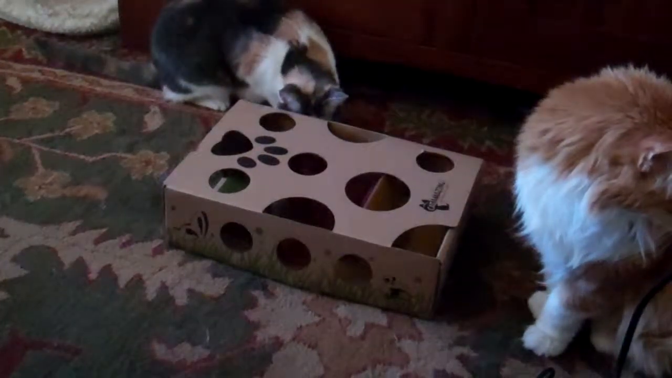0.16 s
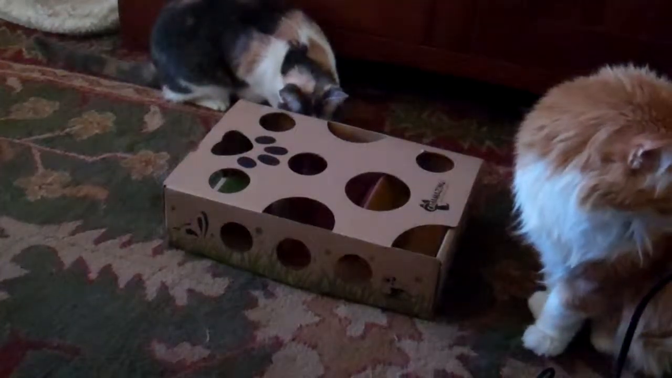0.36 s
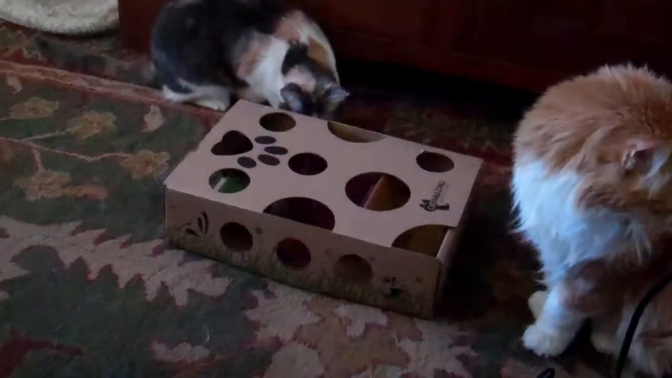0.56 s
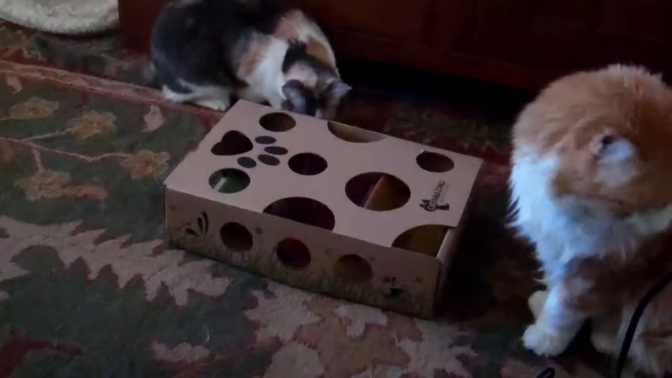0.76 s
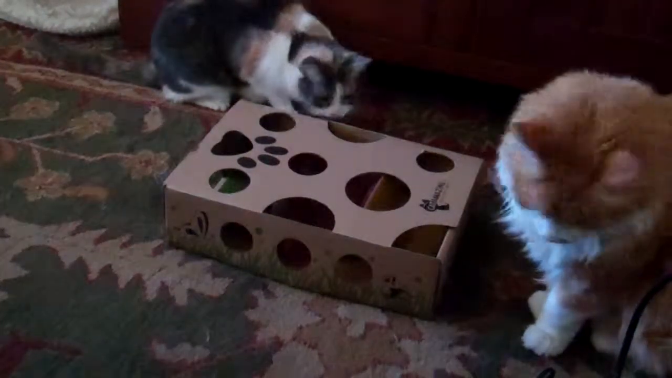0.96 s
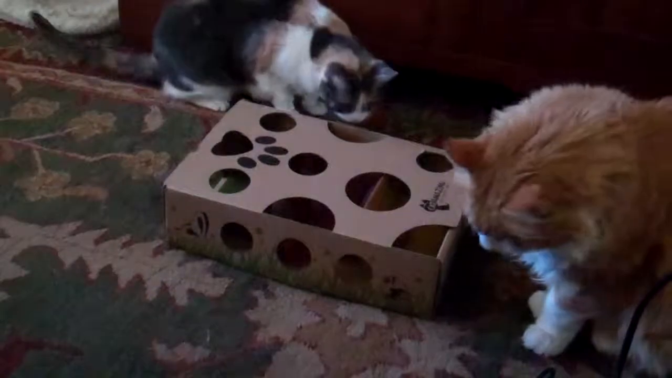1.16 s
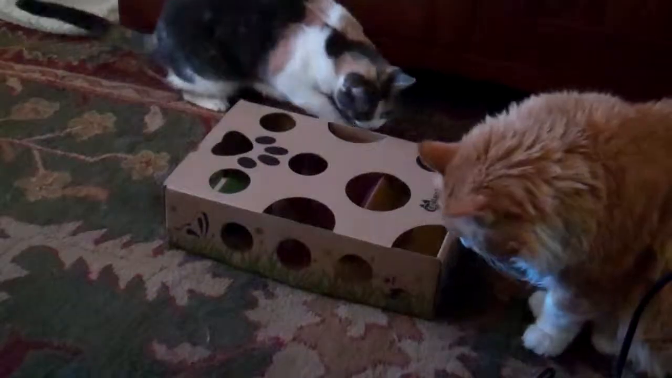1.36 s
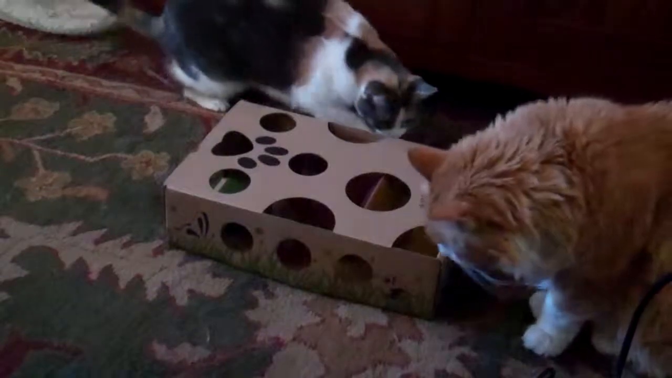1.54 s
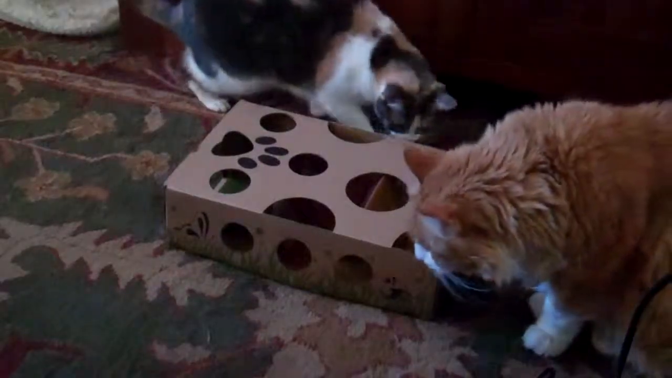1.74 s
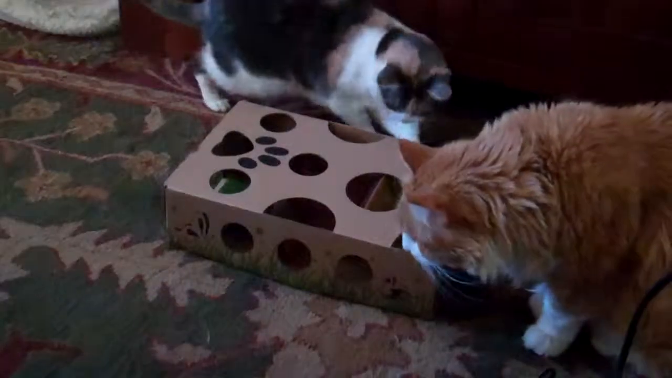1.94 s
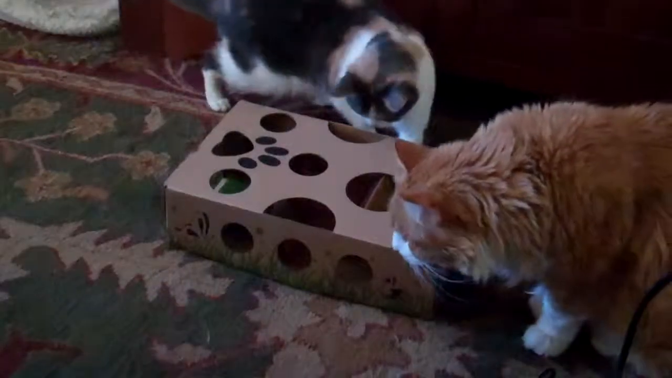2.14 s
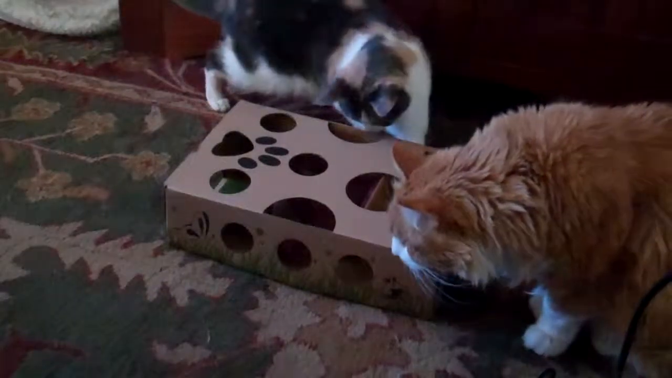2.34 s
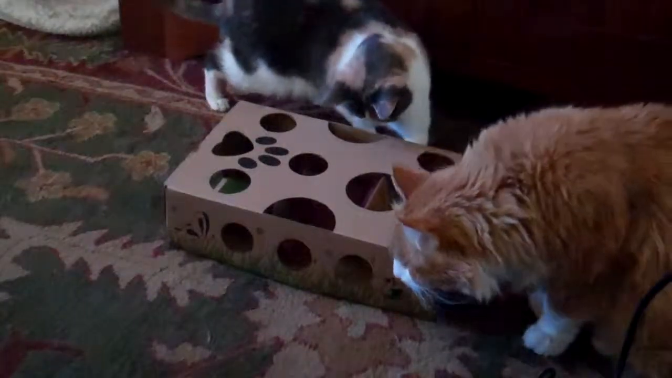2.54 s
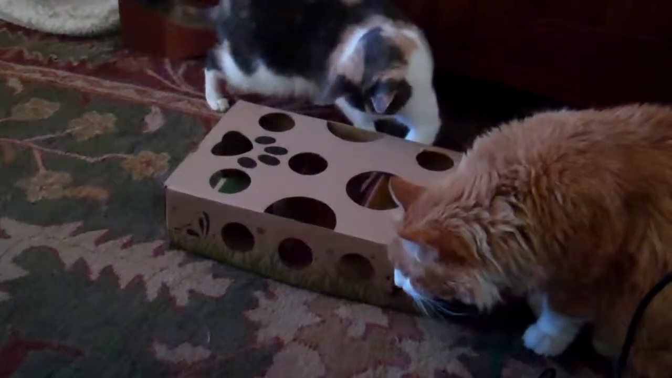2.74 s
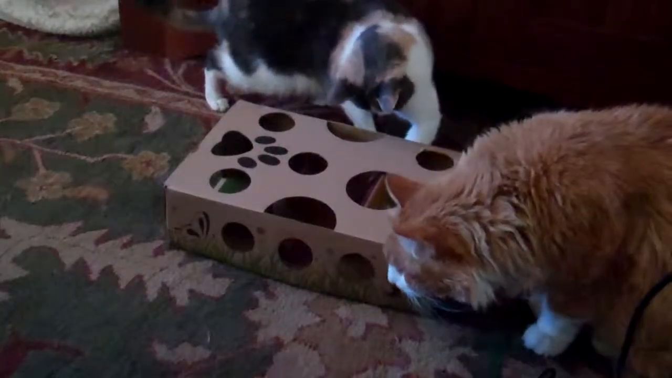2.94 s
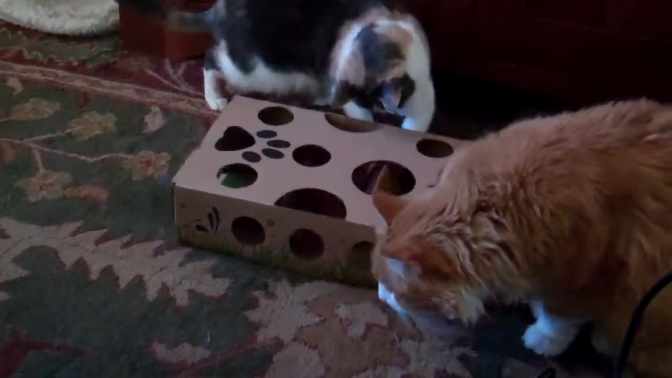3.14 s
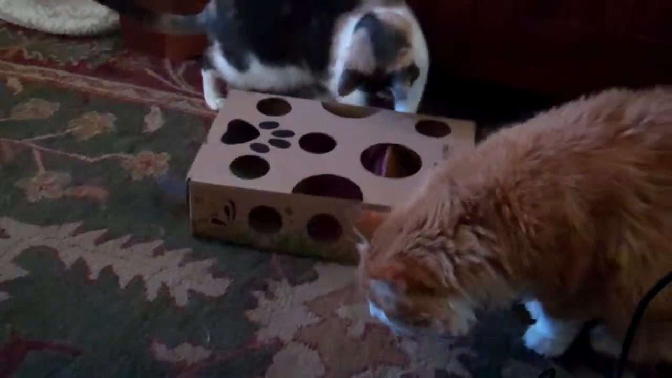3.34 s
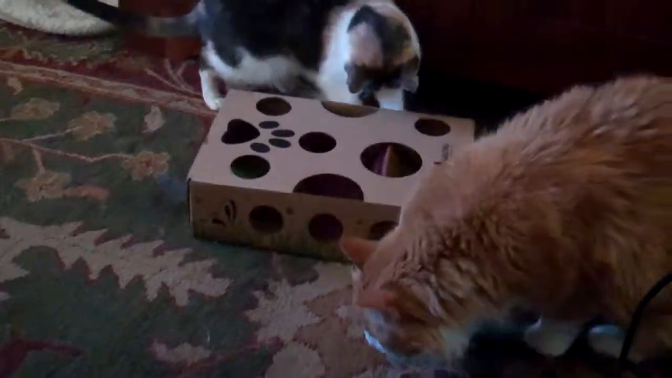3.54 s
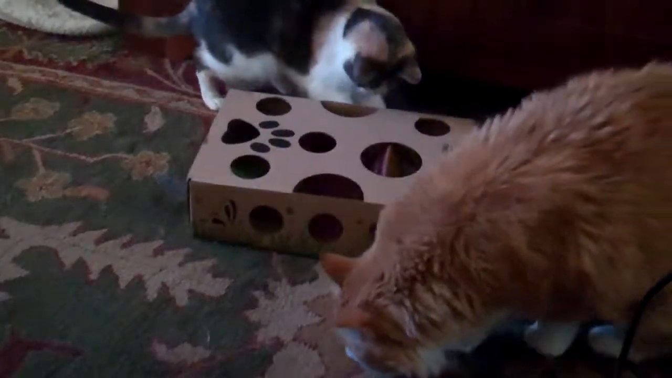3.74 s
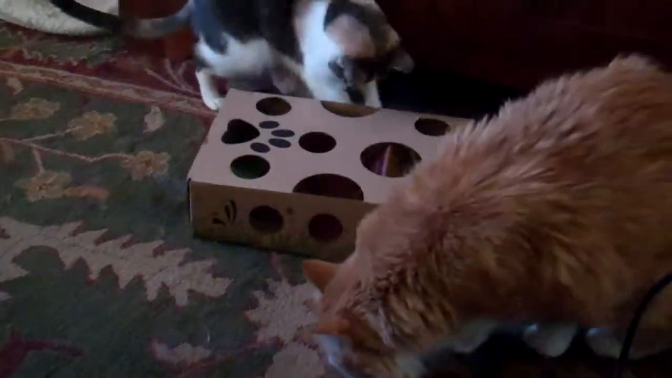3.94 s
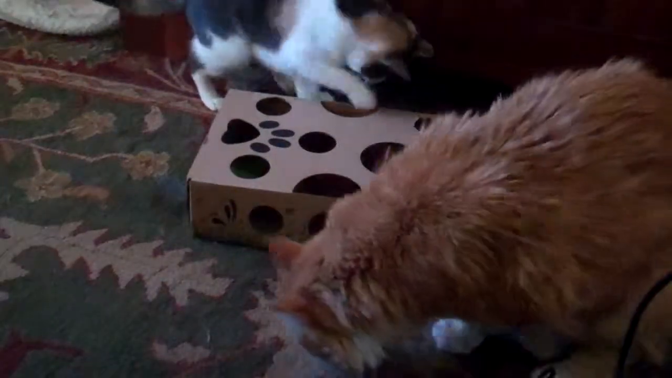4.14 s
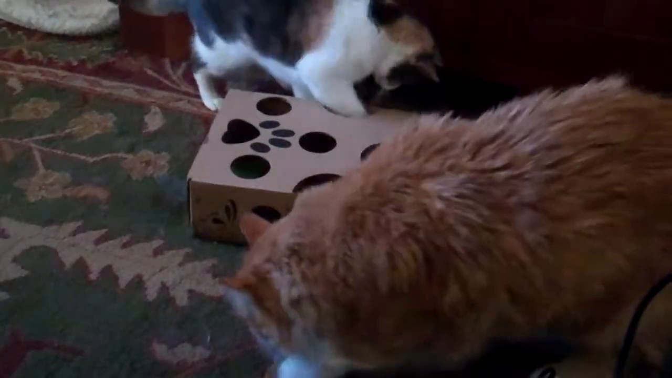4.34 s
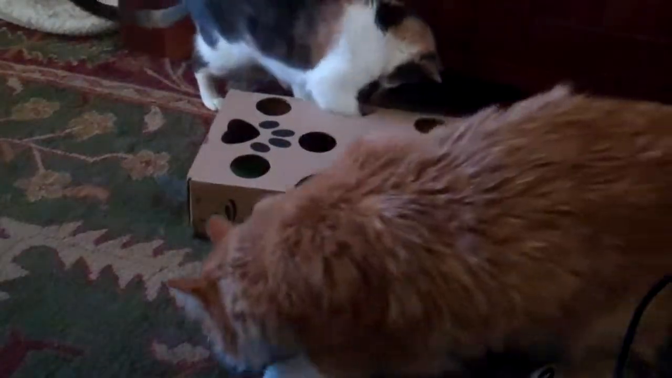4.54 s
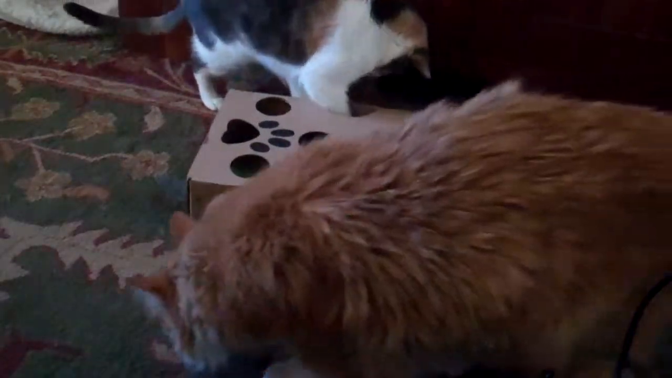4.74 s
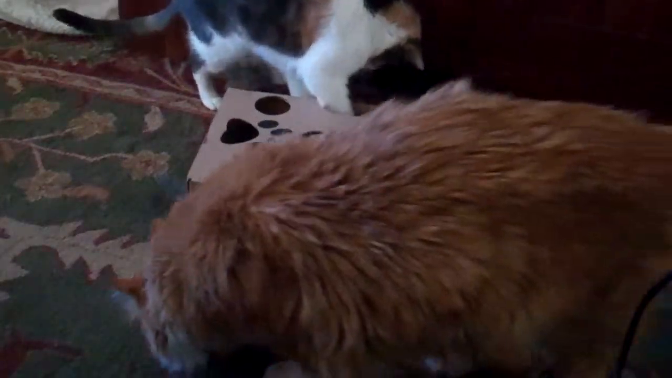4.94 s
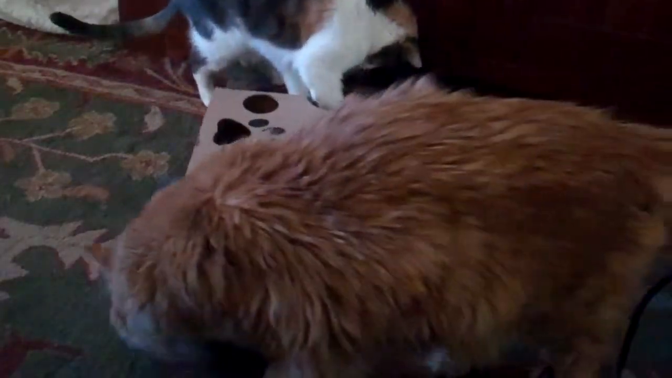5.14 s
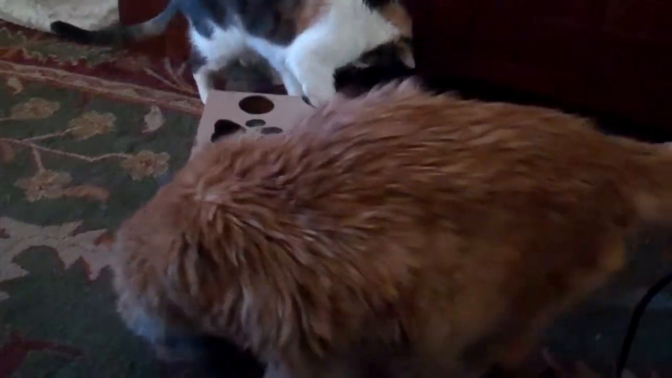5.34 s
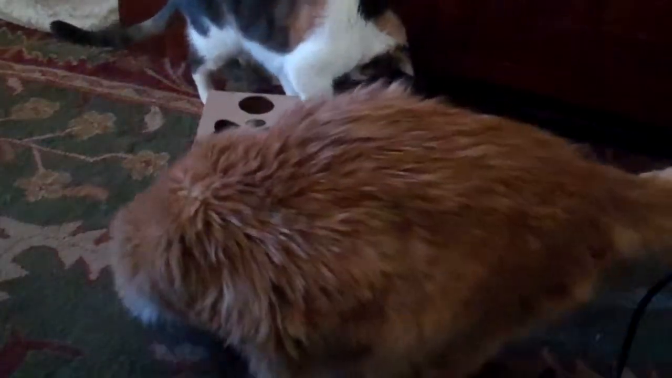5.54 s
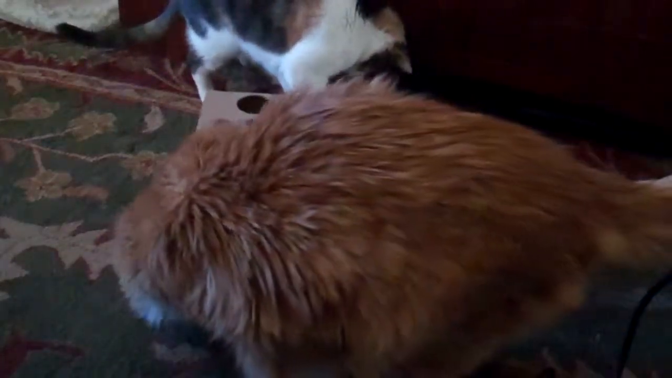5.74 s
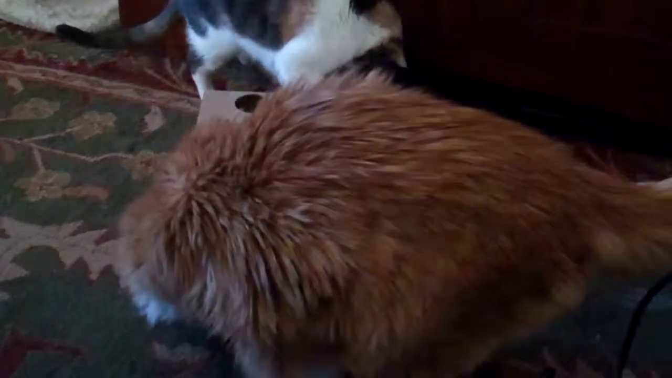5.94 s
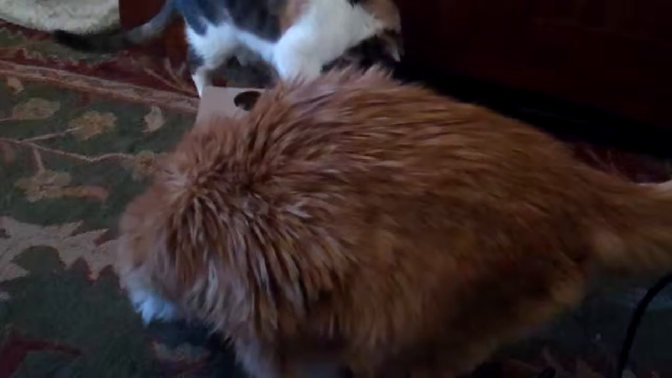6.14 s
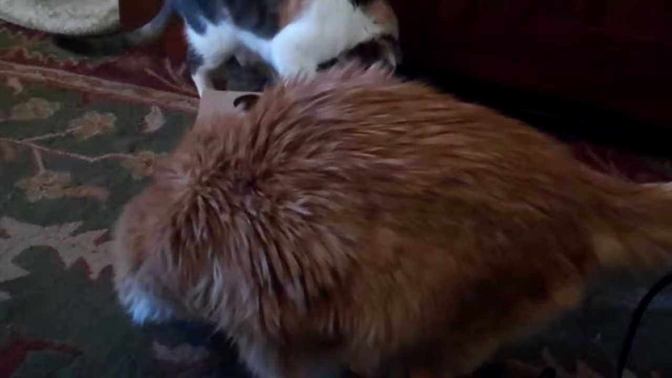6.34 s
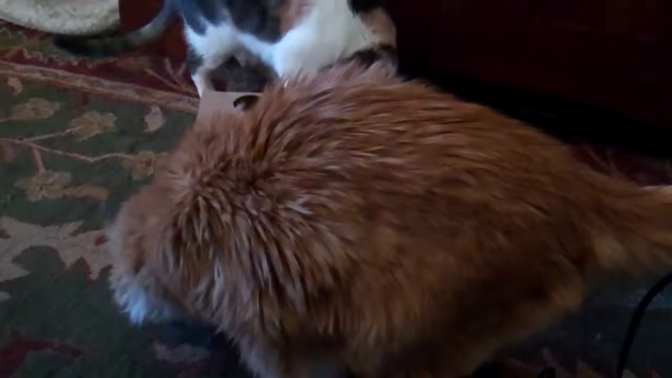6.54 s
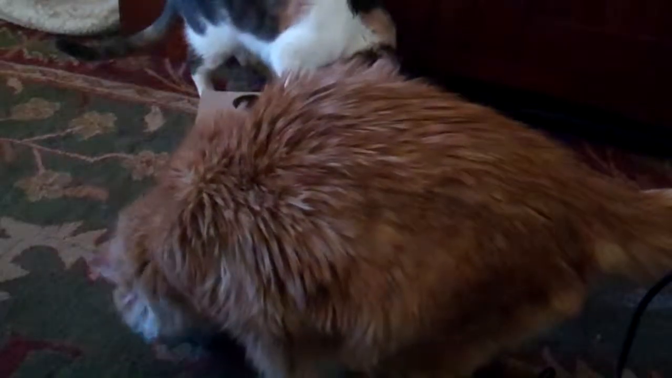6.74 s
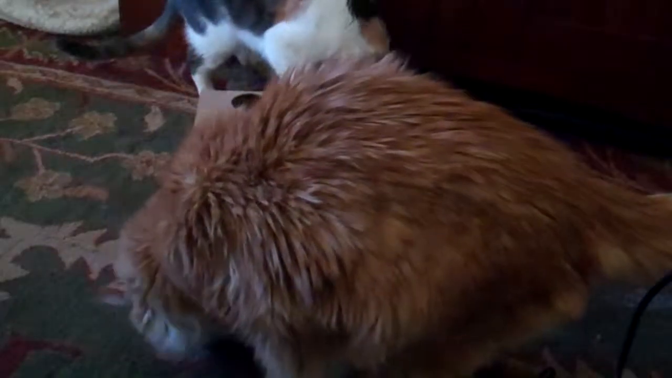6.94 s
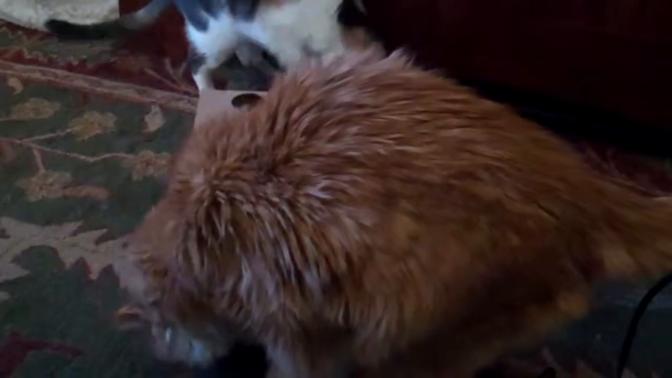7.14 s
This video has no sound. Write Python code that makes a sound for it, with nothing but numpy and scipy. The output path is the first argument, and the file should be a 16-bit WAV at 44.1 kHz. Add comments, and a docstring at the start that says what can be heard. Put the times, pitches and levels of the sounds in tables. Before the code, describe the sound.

A quiet carpeted room with faint air hiss and low appliance hum. A cat paws at a hollow cardboard puzzle box: a light tap and rattle, then scratches, a tiny squeak and a soft drag over the rug. A cluster of knocks and rasping follows, then sharper isolated claw knocks, ending in soft pats. Close microphone, box slightly left, short room echo.

```python
"""A small quiet room with a rug: a cat fishes through the holes of a cardboard puzzle box, a step away.
Its claws knock, scrape and squeak on the card (struck echoes, shaped noise, wavering tones), its pads
pat and groan, something light rocks inside, and the box drags over the pile before fur brushes the card.
The hollow box rings in its modes, the room answers with decaying noise, and an appliance hums under
still air. The camera's gain control ducks just after the sharpest knocks."""
import sys
import numpy as np
from scipy import signal
from scipy.fft import rfft, irfft, next_fast_len
from scipy.io import wavfile
from scipy.ndimage import uniform_filter1d, minimum_filter1d, map_coordinates

SR = 44100
rng = np.random.default_rng(int(sys.argv[2]) if len(sys.argv) > 2 else 0)


def put_to_file(sound):
    """Save the sound as 16-bit audio at rate SR, in the file named by the first command-line argument."""
    columns = np.atleast_2d(sound).T  # one column per channel
    safe = np.clip(columns, -1, 1)
    whole_steps = np.round(safe * 32767)
    wavfile.write(sys.argv[1], SR, whole_steps.astype(np.int16))


N = 321489  # length [samples]

# A claw strikes the card, then skids; levels before the box and mix trims: (time [s], level [dB],
# contact pitch [Hz], tip's tick [dB rel. level], skid [dB rel. level], boom [dB rel. level], boom pitch [Hz])
KNOCKS = [(1.249, -50, 3040, -1, -8, -18, 500), (2.231, -35, 2710, -29, -15.5, -24, 900),
          (3.460, -37.5, 1510, 0, -14, 1.5, 504), (3.674, -29.5, 1040, -25, -35, -12, 900),
          (3.69, -40.5, 3380, -20, -18, -21, 1390), (3.700, -56, 1970, -14, -25, -14, 1100),
          (3.7045, -38, 3000, -19, -36, -4, 434), (3.749, -40, 1550, -21, -26, -19, 1300),
          (3.799, -30, 835, -15, -29, -23, 440), (3.8004, -29, 2380, -14, -16.5, -2, 1630),
          (4.4873, -30, 1005, -16, -6.5, -5.5, 650), (4.995, -46, 3950, -15, -23, 0, 895),
          (5.3438, -21.5, 2540, -18, -28, -3, 710), (5.566, -29.5, 1210, -14, -8, -22, 1380),
          (5.591, -34, 3460, -2.5, -12, -2, 483), (6.26, -19.5, 2490, -7.5, -32, -13, 584),
          (6.553, -48, 2210, -19, -1, -18, 900), (7.053, -31, 1290, -3, -10, 3, 426)]
# A soft pad lands on the lid: (time [s], boom level before trim [dB], boom pitch [Hz])
PATS = [(3.510, -47, 920), (4.876, -46.5, 730), (4.933, -45.5, 565), (5.719, -42, 492), (6.585, -52, 606),
        (6.656, -46, 500), (6.727, -36.5, 518), (6.919, -38, 495), (7.056, -40.5, 236)]
# Air and panel modes of the box: (frequency [Hz], level [dB], undamped t60 [s])
BOX_MODES = [(234, 8, 0.065), (350, -18, 0.18), (435, 5, 0.15), (531, 0.5, 0.18), (626, -1.5, 0.2),
             (739, -8.5, 0.14), (854, -6, 0.23), (970, -17, 0.24), (1120, -1.5, 0.06), (1380, -3.5, 0.17),
             (1575, -6.5, 0.43), (1800, -9.5, 0.024), (2180, -21, 0.15), (2280, -8, 0.14),
             (2867, -10.5, 0.018), (3890, -10, 0.014), (4500, -10, 0.067)]
# Colour of the flexing panel: (frequency [Hz], relative density [dB per Hz])
PANEL_COLOUR = [(120, -35), (300, -10.5), (390, -20.5), (460, 2.5), (560, 1), (700, -2), (900, 0.5),
                (1150, -1.5), (1500, -3), (2300, -5), (5000, -69)]
# Colour of the rug's pile: (frequency [Hz], relative density [dB per Hz])
PILE_COLOUR = [(500, -29), (1400, -6), (2500, -0.5), (4200, -2), (7000, -5.5), (10300, -8), (12000, -19),
               (14500, -42.5)]
# Stereo image of sounds close to the microphone: (frequency [Hz], left-right likeness [0-1])
NEAR_ALIKE = [(200, 0.98), (2000, 1), (5000, 0.79), (11000, 0.69)]


def amp(db):
    """Decibels to gain."""
    return 10 ** (np.asarray(db) / 20)


def unit(x):
    """Scale to rms 1."""
    return x / np.sqrt(np.mean(x ** 2) + 1e-20)


def along(points, hz):
    """Read (Hz, value) points on a log frequency axis."""
    f, v = np.transpose(points)
    return np.interp(np.log(hz + 1), np.log(f + 1), v)


def wobble(rate):
    """A smooth random curve with rate knots a second."""
    grid = np.arange(0, N * rate / SR + 1, 1 / 8)
    knots = rng.standard_normal(int(grid[-1]) + 4)
    curve = map_coordinates(knots, [grid])
    return np.interp(np.arange(N) * rate / SR, grid, curve)


def filtered(x, response):
    """x times a response of frequency."""
    n = x.shape[-1]
    m = next_fast_len(n + 8192)
    return irfft(rfft(x, m) * response(np.fft.rfftfreq(m, 1 / SR)), m)[..., :n]


def coloured(x, spectrum):
    """x shaped by the given spectrum, at rms 1."""
    return unit(filtered(x, lambda hz: amp(along(spectrum, hz))))


def causal(gain):
    """The sharpest causal (minimum-phase) pulse with this gain over frequency."""
    cepstrum = irfft(np.log(np.maximum(gain, 1e-6)))
    half = len(cepstrum) // 2
    cepstrum[1:half] *= 2
    cepstrum[half + 1:] = 0
    return irfft(np.exp(rfft(cepstrum)))


def stereo(pair, alike):
    """Mix two unrelated signals into left and right of a given likeness."""
    turn = lambda hz: np.arccos(np.clip(along(alike, hz), -1, 1)) / 2
    mid, side = filtered(pair, lambda hz: np.array([np.cos(turn(hz)), np.sin(turn(hz))]))
    return np.array([mid + side, mid - side])


def leaning(x, lean):
    """Tip the left-right balance, keeping the summed gain of the two sides."""
    left = lambda hz: 2 / (1 + amp(-along(lean, hz)))
    return filtered(x, lambda hz: np.array([left(hz), 2 - left(hz)]))


def add(track, s, sound):
    """Mix a sound into the track from time s."""
    part = track[..., max(round(s * SR), 0):][..., :sound.shape[-1]]
    part += sound[..., :part.shape[-1]]


def background(air_db=-57.0):
    """Still air and microphone hiss are wide coloured noise; the appliance is a few wavering sines."""
    # Still air: (frequency [Hz], relative density [dB per Hz])
    air_colour = [(12, -45), (20, -13), (59, -5), (91, -4.5), (119, -5), (147, -11.5), (183, -7),
                  (246, -10), (340, -8.5), (445, -8.5), (1080, -11.5), (1760, -13.5), (3190, -14.5),
                  (7760, -21.5), (12600, -38), (16400, -76), (22000, -120)]
    # Stereo image of the room's air: (frequency [Hz], left-right likeness [0-1])
    air_alike = [(60, 0.78), (150, 0.43), (350, 0.2), (850, 0.19), (2070, 0.045), (5020, 0.067),
                 (12200, 0.038)]
    # The appliance's drone and whine: (frequency [Hz], level before the lean [dB])
    hum_tones = [(119.8, -68), (7853, -109), (7882, -86)]
    # Balance of the room at the microphone: (frequency [Hz], left minus right [dB])
    air_lean = [(60, 4.5), (230, 3.5), (850, 3), (3220, 3.5), (12200, 2)]
    t = np.arange(N) / SR
    air = amp(air_db) * coloured(stereo(rng.standard_normal((2, N)), air_alike), air_colour)
    hum = np.zeros(N)
    for hz, db in hum_tones:
        level = amp(db + 0.21 * wobble(4))
        hum += level * np.sin(2 * np.pi * hz * t + 0.19 * wobble(4.57))
    return leaning(air + hum, air_lean)


def wobbling_toy(start=1.101, db=-46, pitch_hz=660, gap=0.014, life=0.0028, rebound_db=-7, fade_db=-1.0, count=8):
    """Something light in the box rocks to rest: dull taps, brief damped sines of scattered pitch."""
    out, t = np.zeros(N), np.arange(SR // 20) / SR
    for k in range(count):
        hz = pitch_hz * rng.uniform(0.85, 1.095)
        tap = t / life * np.exp(1 - t / life) * np.sin(2 * np.pi * hz * t)
        # every tap after the first is weaker and unevenly timed
        late = gap * (k + rng.uniform(-0.21, 0.18) * (k > 0))
        add(out, start + late, amp(db + rebound_db * (k > 0) + fade_db * k) * tap)
    return out


def room(x, delay=.005, build=0.00055, count=16):
    """Walls and furniture answer with decaying noise; a fresh tail serves each stretch of sound."""
    # Decay of the room: (frequency [Hz], t60 [s])
    decay = [(200, 0.24), (530, 0.21), (1400, 0.31), (3700, 0.22), (9700, 0.28)]
    # Stereo image of the echoes: (frequency [Hz], left-right likeness [0-1])
    echo_alike = [(200, 1), (600, 0.95), (1500, 0.78), (3000, 0.062), (6000, 0.1), (11000, 0.11)]
    out = np.zeros((2, N))
    for block in np.array_split(np.arange(N), count):
        hz, t, z = signal.stft(rng.standard_normal((2, SR // 3)), SR, nperseg=256)
        fading = z * amp(-60 * t / along(decay, hz)[:, None])
        tail = signal.istft(fading, SR, nperseg=256)[1]
        onset = 1 - np.exp(-np.arange(tail.shape[1]) / SR / build)
        tail = stereo(tail * onset, echo_alike)
        answer = signal.fftconvolve(x[None, block], tail / np.linalg.norm(tail[0]), axes=1)
        add(out, block[0] / SR + delay, answer)
    return out


def cavity(x, ring_db=0, through_db=-1.5):
    """Sound leaves by the holes, partly straight and partly after ringing in the box's resonances."""
    def response(hz):
        modes = 0
        for centre, db, t60 in BOX_MODES:
            width = np.log(1000) / (np.pi * t60)  # bandwidth [Hz]
            modes = modes + amp(db) * 1j * hz * width / (centre ** 2 - hz ** 2 + 1j * hz * width)
        return amp(through_db) + amp(ring_db) * modes
    return filtered(x, response)


def contacts(tick_hz=6850, pad_hz=850, pad_snap_db=-3.5):
    """Every touch of the card as (time [s], level [dB], contact pitch [Hz]): claws, their tips, pads."""
    claws = [(s, db, hz) for s, db, hz, *_ in KNOCKS]
    tips = [(s, db + tick_db, tick_hz) for s, db, _, tick_db, *_ in KNOCKS]
    pads = [(s, db + pad_snap_db, pad_hz) for s, db, _ in PATS]
    return claws + tips + pads


def knocks(width=0.93, note_gain=0.65, note_width=0.042, flutter=0.5, bounce=0.00106, bounce_share=0.67, size=4096):
    """Each blow is a snap of the card and a flutter of close echoes inside the box."""
    # Colour of a blow on card: (frequency [Hz], relative density [dB per Hz])
    contact_colour = [(100, -33), (250, -11), (450, -2), (1000, -0.5), (1900, -3.5), (2800, -1), (3700, -9),
                      (5500, -2.5), (8000, -12), (10500, -12), (13000, -36.5), (16000, -49)]
    ring_t60, ring_hz, ring_law = 0.019, 2020, 0.13  # t60 [s] at this pitch [Hz]; lower ones ring longer
    out, t = np.zeros((2, N)), np.arange(size) / SR
    hz = np.fft.rfftfreq(size, 1 / SR)
    for s, db, pitch_hz in contacts():
        t60 = ring_t60 * (ring_hz / pitch_hz) ** ring_law
        # the struck patch of card has a broad colour with one brief note at its centre
        detune = hz / pitch_hz - pitch_hz / (hz + 1)
        contact = 1 / np.hypot(1, detune / width) + note_gain / np.hypot(1, detune / note_width)
        snap = causal(amp(along(contact_colour, hz)) * contact)
        echoes = flutter * rng.standard_normal((2, size)) * amp(-60 * t / t60)
        echoes[0, 0] += 2
        # the far wall sends the snap back about a millisecond later
        echoes[0, int(bounce * rng.uniform(.9, 1.1) * SR)] += 2 * bounce_share
        blow = signal.fftconvolve(stereo(echoes, NEAR_ALIKE), snap[None], axes=1)
        # equal energy for every blow: that of 4 ms at rms 1
        blow *= np.sqrt(.004 * SR / np.sum(blow.mean(0) ** 2))
        add(out, s, amp(db) * blow)
    return cavity(out)


def pushes():
    """The weight behind every claw and pad as (time [s], level [dB], boom pitch [Hz])."""
    return [(s, db + boom_db, hz) for s, db, *_, boom_db, hz in KNOCKS] + PATS


def booms(level_db=-2, spread_db=3, width=0.3, swell=0.0026, damping=2.04, thud_db=-1, thud_t60=0.037, thud_width=0.099):
    """The slower push behind each blow gives a dull thud and rings the box modes nearest its pitch."""
    out, t = np.zeros(N), np.arange(SR // 3) / SR
    mode_hz, mode_db, mode_t60 = np.transpose(BOX_MODES)[:, :, None]
    # the paw stays on the card and damps it
    rings = amp(-60 * damping * t / mode_t60) * np.sin(2 * np.pi * mode_hz * t)
    for s, db, boom_hz in pushes():
        reach = lambda hz, span: 1 / (1 + ((hz / boom_hz - boom_hz / (hz + 1)) / span) ** 2)
        scattered_db = mode_db + spread_db * rng.standard_normal(mode_db.shape)
        ringing = np.sum(reach(mode_hz, width) * amp(scattered_db) * rings, 0)
        noise = filtered(rng.standard_normal(len(t)), lambda hz: reach(hz, thud_width))
        thud = amp(thud_db - 60 * t / thud_t60) * unit(noise)
        add(out, s, amp(db + level_db) * (ringing + thud) * (1 - np.exp(-t / swell)))
    return out


def friction(spectrum, rate, grain_share, rough_db, rough_rate, patchy_db):
    """Fibres snag at random (rate a second) over a hiss, coloured in random patches of time and pitch."""
    snags = (rng.random(N) < rate / SR) * rng.standard_normal((2, N))
    share = np.clip(grain_share, 0, 1)
    force = np.sqrt(share) * unit(snags) + np.sqrt(1 - share) * rng.standard_normal((2, N))
    z = signal.stft(force * amp(rough_db * wobble(rough_rate)), nperseg=512)[2]
    # a smoothed random gain over frequency and time makes the noise uneven
    field = uniform_filter1d(rng.standard_normal(z.shape[1:]), size=4, axis=0)
    field = uniform_filter1d(field, size=7, axis=1)
    force = signal.istft(z * amp(patchy_db * unit(field)), nperseg=512)[1][:, :N]
    return coloured(stereo(force, NEAR_ALIKE), spectrum)


def scrapes(rise=0.006, fall=0.0054, soften=.05, uneven_db=0.83, uneven_rate=45, rasp_db=1.5, panel_db=-1.0, grit_db=-1):
    """A dragged claw or paw rasps, shakes the panel and sheds a fine grit of sound: three friction noises."""
    # A paw is drawn along the card, levels before trims:
    # (time [s], length [s], rasp [dB], panel [dB rel. rasp], grit [dB rel. rasp])
    strokes = [(1.255, 0.036, -60, -7, 6), (2.24, .016, -46.5, -6, -13), (2.391, 0.079, -68.5, -6, 10),
               (2.441, .024, -50, -3, -4.5), (2.647, 0.069, -49, -1, 3), (2.829, 0.15, -55, -8, -5),
               (3.015, 0.039, -61.5, 9, -1), (3.242, 0.016, -49, -3, -1.5), (3.368, 0.062, -49.5, -2, -18),
               (3.493, 0.025, -45, 1, -10), (3.564, 0.046, -48.5, -1, -6), (3.697, 0.01, -45, 14, 2.5),
               (3.815, 0.029, -38, -17, -1.5), (4.14, .043, -61.5, 1, 6.5), (4.199, .042, -44, -11, 1),
               (4.255, 0.056, -47, -5.5, 0), (4.379, 0.02, -49.5, 0, 3.5), (4.518, .056, -54.5, -10, -2),
               (4.609, 0.095, -47.5, -4, 0.5), (4.715, 0.076, -44, -1, -1.5), (4.872, 0.021, -51, 4, -1.5),
               (5.055, 0.032, -59.5, 7, -6), (5.612, 0.042, -51, 6, 3), (5.711, 0.046, -51, 3, -4),
               (5.941, .05, -66, 8.5, -11), (6.582, 0.084, -52, 1.5, -2), (6.70, 0.054, -53, 3.5, -2.5),
               (6.835, 0.095, -50, -1.5, -3.5)]
    # A claw's rasp: (frequency [Hz], relative density [dB per Hz])
    rasp_colour = [(600, -35), (1200, -5.5), (1700, -3), (2300, 2.5), (2900, 4), (3500, 2), (4600, -2),
                   (6000, -11), (10000, -65)]
    # A claw's grit: (frequency [Hz], relative density [dB per Hz])
    grit_colour = [(2500, -33), (4500, -7.5), (5800, -3), (8500, -2), (10500, -5.5), (12000, -19),
                   (14000, -35), (16000, -60)]
    # a short stroke follows each claw's blow: delay [s], length [s], panel and grit [dB rel. rasp]
    skid_delay, skid_length, skid_panel_db, skid_grit_db = 0.0024, 0.017, -2.5, -4.5
    skids = [(s + skid_delay, skid_length, db + skid_db, skid_panel_db, skid_grit_db)
             for s, db, _, _, skid_db, *_ in KNOCKS]
    t, drive = np.arange(SR // 3) / SR - 1 / 20, np.zeros((3, N))
    for s, length, db, panel_rel, grit_rel in strokes + skids:
        # pressure builds around the touch and lets go at the lift, more gently in a long stroke
        touch = (1 + np.tanh(t / (rise + soften * length))) / 2
        lift = (1 - np.tanh((t - length) / (fall + soften * length))) / 2
        add(drive, s + t[0], amp([db, db + panel_rel, db + grit_rel])[:, None] * touch * lift)
    rasp = amp(rasp_db) * drive[0] * friction(
        rasp_colour, rate=1200, grain_share=0.26, rough_db=1.0, rough_rate=380, patchy_db=4)
    panel = amp(panel_db) * drive[1] * friction(
        PANEL_COLOUR, rate=740, grain_share=0.69, rough_db=2.0, rough_rate=150, patchy_db=-0.5)
    grit = amp(grit_db) * drive[2] * friction(
        grit_colour, rate=3100, grain_share=0.32, rough_db=1, rough_rate=100, patchy_db=4.5)
    return (rasp + panel + grit) * amp(uneven_db * wobble(uneven_rate))


def catches(rate, size, life=0.0042):
    """At random, rate times a second, the contact catches on a ridge and lets go with a jerk in level."""
    u = np.arange(SR // 50) / SR / life
    jerks = (rng.random(N) < rate / SR) * rng.uniform(0, 1.2, N)
    return unit(1 + size * signal.fftconvolve(jerks, u * np.exp(1 - u))[:N])


def squeaks(waver=0.072):
    """Stick and slip turns a claw into short unsteady whistles, each with a scratch."""
    # A claw catching and slipping:
    # (centre time [s], level [dB], mean pitch [Hz], swell to 1/e either side [s], scratch level [dB])
    slips = [(2.670, -29.5, 2600, .006, -34.5), (2.686, -32, 9670, 0.0007, -29.5),
             (2.7063, -37, 3310, 0.0024, -36.5)]
    out, t = np.zeros((2, N)), np.arange(N) / SR
    drift = 1 + waver * wobble(1500)
    scratch = coloured(stereo(rng.standard_normal((2, N)), NEAR_ALIKE), PILE_COLOUR)
    for s, db, pitch_hz, length, scratch_db in slips:
        near = abs(t - s) < 2 * length
        whistle = amp(db) * np.sin(2 * np.pi * np.cumsum(pitch_hz * drift[near]) / SR)
        swell = np.exp(-((t[near] - s) / length) ** 2)
        out[:, near] += swell * (whistle + amp(scratch_db) * scratch[:, near])
    return out


def slides(hiss_db=-1, panel_db=-2):
    """Soft fibres sweep the card: a smooth hiss swells with speed, and the panels mutter under load."""
    # The box dragging on the rug, then fur brushing the card, levels before trims:
    # (start [s], fastest [s], stop [s], hiss level [dB], panel level [dB])
    sweeps = [(3.026, 3.37, 3.566, -47, -46), (4.96, 5.14, 5.37, -56.5, -66.5), (5.72, 5.8, 5.95, -58, -62)]
    hiss_law, load_law, load_lag = 0.72, 3, 0.18  # powers of the speed arch; lag of the load's peak [s]
    t, hiss, panel = np.arange(N) / SR, np.zeros(N), np.zeros(N)
    for start, fastest, stop, hiss_level, panel_level in sweeps:
        arch = lambda top: np.sin(np.pi / 2 * np.interp(t, [start, top, stop], [0, 1, 0]))
        hiss += amp(hiss_level + hiss_db) * arch(fastest) ** hiss_law
        panel += amp(panel_level + panel_db) * arch(fastest + load_lag) ** load_law
    fibres = friction(PILE_COLOUR, rate=3000, grain_share=0.18, rough_db=0.5, rough_rate=110, patchy_db=-0.5)
    mutter = friction(PANEL_COLOUR, rate=730, grain_share=0.51, rough_db=1.5, rough_rate=120, patchy_db=2.5)
    return hiss * fibres + panel * mutter


def groan(waver=0.1, rough_db=4, sag_per_s=.8):
    """Stick and slip under a soft pad gives a weak, unsteady tone that swells, fades and sinks in pitch."""
    # A pad judders on the card: (time [s], length [s], nominal starting pitch [Hz], level [dB])
    judders = [(4.19, 0.15, 518.6, -51), (4.378, 0.086, 346, -54.5)]
    out, drift, rough = np.zeros(N), 1 + waver * wobble(150), amp(rough_db * wobble(120))
    for s, length, pitch_hz, db in judders:
        t = np.arange(int(length * SR)) / SR
        # the pitch loses this share of its start each second
        hz = pitch_hz * (1 - sag_per_s * t) * drift[int(s * SR):][:len(t)]
        phase = 2 * np.pi * np.cumsum(hz) / SR
        add(out, s, amp(db) * np.sin(np.pi * t / length) * np.sin(phase))
    return out * rough


def scene(knock_room_db=-3, rub_room_db=-7, absorb_hz=6000):
    """The box lies a little to the left, a step away; the rug soaks up treble in the room's answer to blows."""
    # Balance of the box at the microphone: (frequency [Hz], left minus right [dB])
    box_lean = [(200, 4), (1200, 3.5), (3700, 5.5), (7000, 7), (10000, 11)]
    blows = knocks() + booms() + wobbling_toy()
    scraping = scrapes() * catches(rate=50, size=.5)
    sliding = slides() * catches(rate=130, size=.15)
    rubs = cavity(scraping + sliding) + squeaks() + groan()
    softened = filtered(blows.mean(0), lambda hz: 1 / (1 + 1j * hz / absorb_hz))
    answer = room(amp(knock_room_db) * softened + amp(rub_room_db) * rubs.mean(0))
    return leaning(blows + rubs + answer, box_lean) + background()


def gain_control(x, threshold_db, slope, lag, hold, glide, sense, sense_hz):
    """Sharp loud sounds turn the gain down a moment later; it holds, then comes back."""
    # it listens to the left side with the bass reduced
    bright = filtered(x[0], lambda hz: hz / np.hypot(hz, sense_hz))
    level_db = 10 * np.log10(abs(uniform_filter1d(bright ** 2, int(sense * SR))) + 1e-12)
    cut_db = -slope * np.maximum(level_db - threshold_db, 0)
    held_db = uniform_filter1d(minimum_filter1d(cut_db, int(hold * SR)), int(glide * SR))
    t = np.arange(N) / SR
    return x * amp(np.interp(t - hold / 2 - lag, t, held_db))


def record(dry, top_hz=13400):
    """The camera rides its gain and cuts steeply above its band limit."""
    # times in s
    ridden = gain_control(dry, threshold_db=-34.5, slope=0.98, lag=0.036, hold=0.24, glide=0.096,
                          sense=0.012, sense_hz=2120)
    return filtered(ridden, lambda hz: 1 / np.sqrt(1 + (hz / top_hz) ** 60))


dry = scene()
out = record(dry)
put_to_file(out)
```